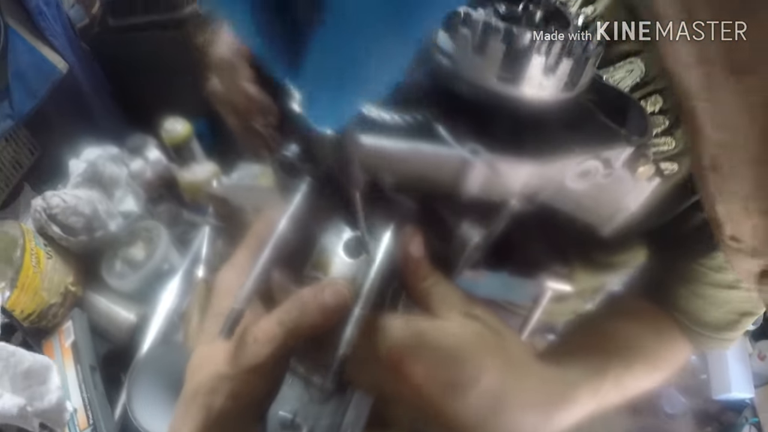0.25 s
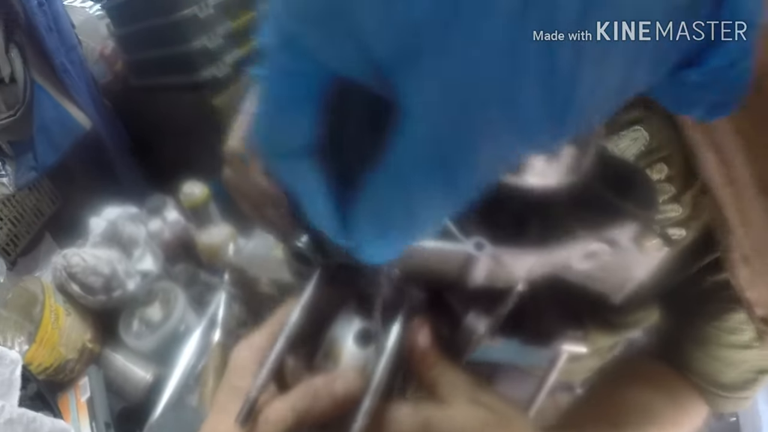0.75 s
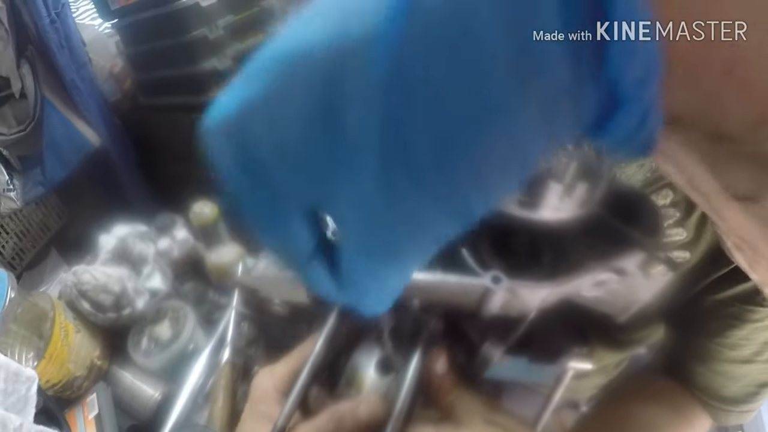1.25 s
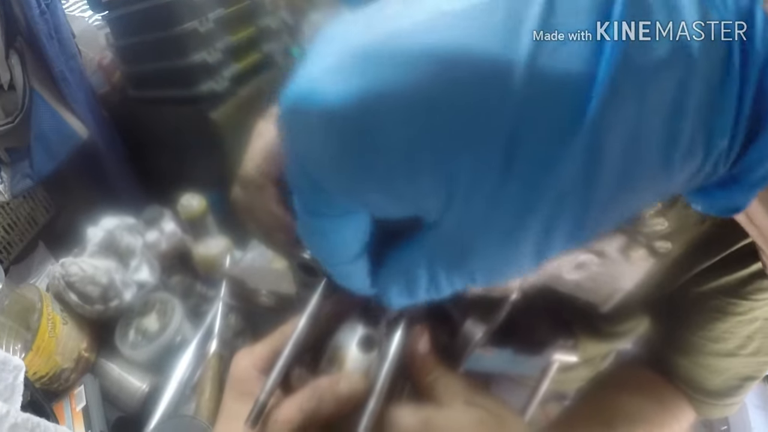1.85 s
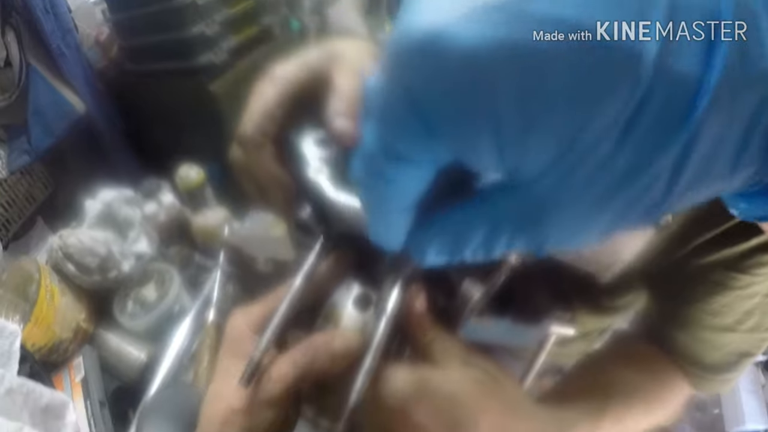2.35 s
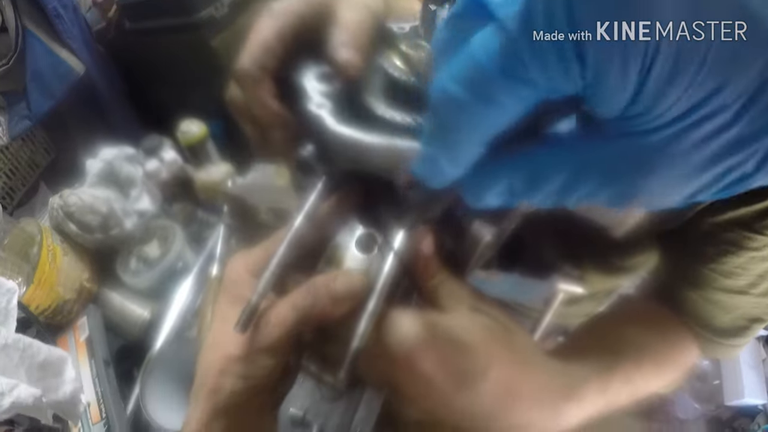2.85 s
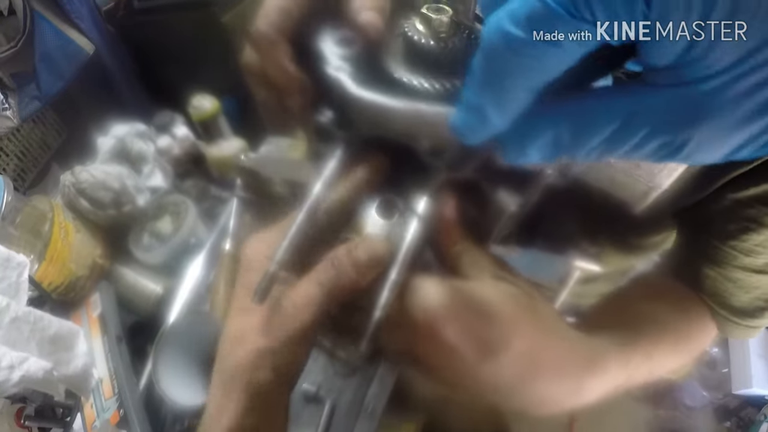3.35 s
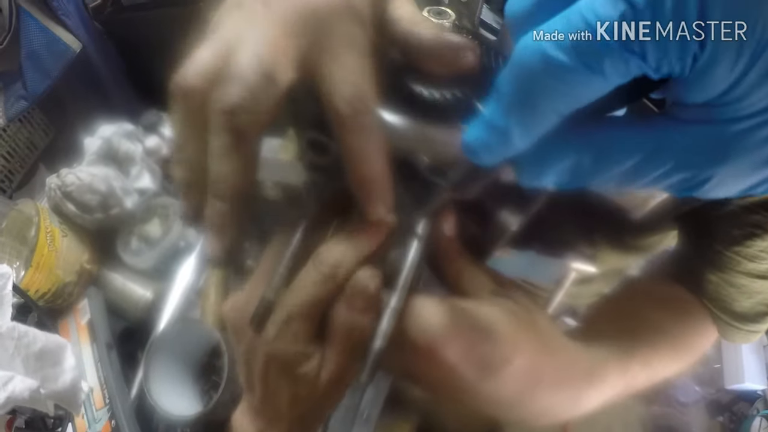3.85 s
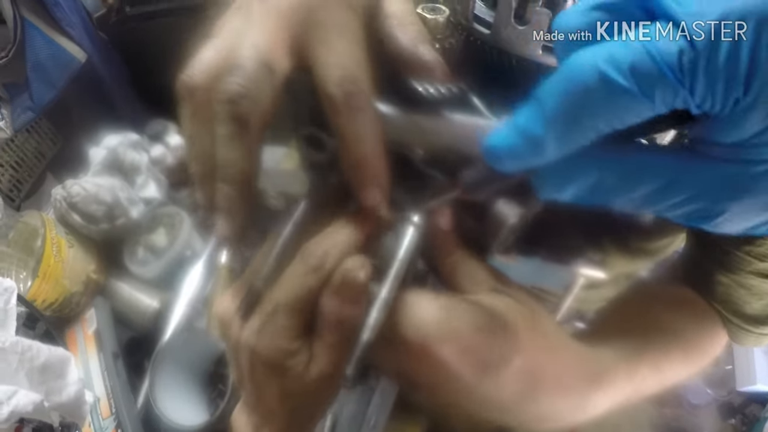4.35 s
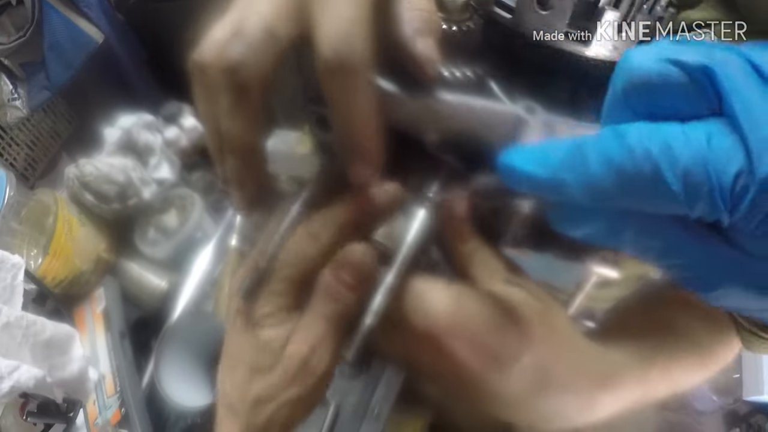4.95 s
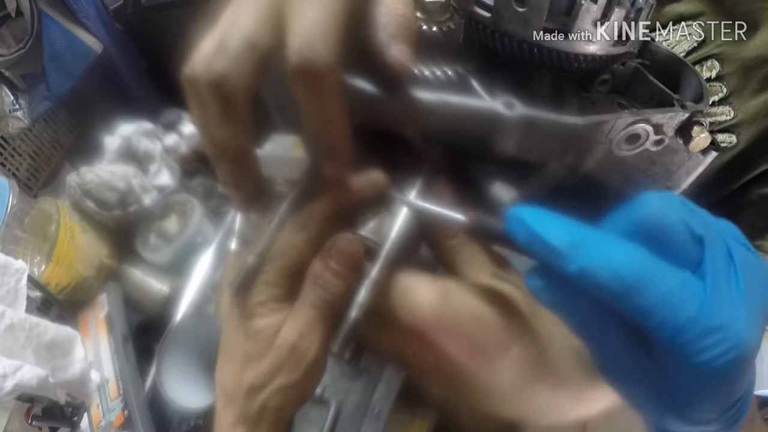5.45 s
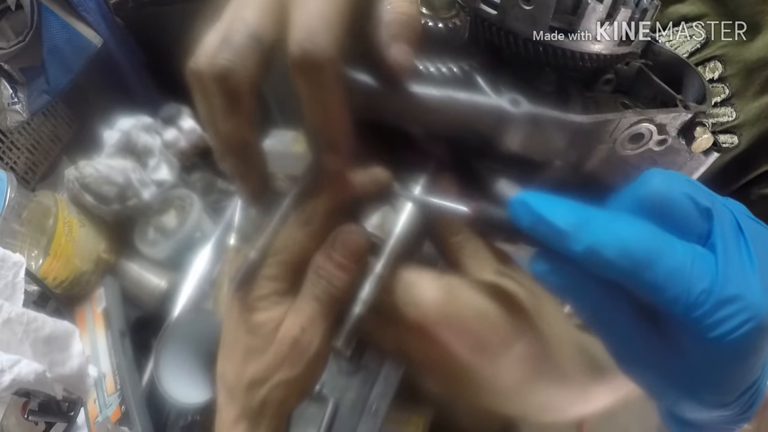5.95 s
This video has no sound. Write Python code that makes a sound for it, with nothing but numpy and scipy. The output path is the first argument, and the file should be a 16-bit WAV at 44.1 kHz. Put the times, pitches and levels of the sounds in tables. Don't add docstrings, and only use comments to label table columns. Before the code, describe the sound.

Hands work on an engine at a bench, heard close and fairly dry with a short room echo. Sparse snaps and soft rubbing come first, then a blunt tray knock and thin whistling turns while traffic swells outside. A lull with small ticks follows, then a dull nudge and the loudest hit, a hard metallic clank with settling rattle and squeaks. A sharp high clink rings briefly; only rumble, hiss and one tiny touch remain.

```python
import sys
import numpy as np
from scipy import signal
from scipy.fft import rfft, irfft, next_fast_len
from scipy.io import wavfile
from scipy.ndimage import uniform_filter1d, map_coordinates

SR = 44100
rng = np.random.default_rng(int(sys.argv[2]) if len(sys.argv) > 2 else 0)


def wav_out(sig):
    wavfile.write(sys.argv[1], SR, np.round(np.clip(np.atleast_2d(sig).T, -1, 1) * 32767).astype(np.int16))


def boost(x):
    u = np.asarray(x, float) / 20
    return 10 ** u


N = 272979
EASE_S = .007

# (frequency [Hz], width [Hz], level [dB])
CASING_PEAKS = [(973, 800, -17), (1480, 210, -7), (1860, 1200, 2), (3590, 590, 2.5), (4550, 170, -8),
                (4700, 450, 1), (6170, 390, -0.5), (7500, 280, -18.5), (9000, 1030, -22),
                (14000, 1300, -22)]
# (time [s], level [dB])
PASSING_LEVEL = [(0, -65), (.8, -59), (1.5, -57), (2, -61.5), (2.55, -60), (2.82, -67), (3.0, -69),
                 (4.4, -71.5), (5, -74), (6.19, -78)]


def unit(x):
    return x / np.sqrt(np.mean(x ** 2) + 1e-20)


def along(points, hz):
    f, v = np.transpose(points)
    return np.interp(np.log(hz + 1), np.log(f + 1), v)


def curves(rows):
    s, *cols = np.transpose(sorted(rows))
    return [np.interp(np.arange(N) / SR, s, c) for c in cols]


def strokes(tables, fade):
    gate = np.zeros(N)
    for rows in tables:
        start, end = rows[0][0] - fade, rows[-1][0] + fade
        gate[round(start * SR):round(end * SR)] = 1
    return np.abs(uniform_filter1d(gate, int(2 * fade * SR))), curves(sum(tables, []))


def held(tables, values):
    return [[(*row, *np.atleast_1d(v)) for row in rows] for rows, v in zip(tables, values)]


def wobble(rate):
    knots = rng.standard_normal(int(N * rate / SR) + 4)
    return map_coordinates(knots, [np.arange(N) * rate / SR])


def swell(s, rise, fall):
    t = np.arange(N) / SR - s
    return t / np.where(t < 0, rise, fall)


def heave(rows):
    return sum(db * np.exp(-.5 * swell(s, length, length) ** 2) for s, db, length in rows)


def filtered(x, response):
    m = next_fast_len(N + SR // 2)
    return irfft(rfft(x, m) * response(np.fft.rfftfreq(m, 1 / SR)), m)[:N]


def body(peaks):
    def response(f):
        total = 0
        for k, (centre, width, db) in enumerate(peaks):
            damping = 1j * f * width
            total = total + (-1) ** k * boost(db) * damping / (centre * centre - f * f + damping)
        return total
    return response


def rush(spectrum):
    return unit(filtered(rng.standard_normal(N), lambda hz: boost(along(spectrum, hz))))


def add(track, s, sound):
    part = track[max(round(s * SR), 0):][:len(sound)]
    part += sound[:len(part)]


def rattle_force(db, t60):
    t = np.arange(SR // 8) / SR
    return boost(db - 60 * t / max(t60, .002)) * rng.standard_normal(len(t))


def struck(contacts, part, soft_hz=np.inf):
    force = np.zeros(N)
    for s, db, t60 in contacts:
        add(force, s, rattle_force(db, t60))
    return filtered(force, lambda hz: body(part)(hz) / (1 + 1j * hz / soft_hz) ** 2)


def ringing(modes, blows, attack):
    out, t = np.zeros(N), np.arange(SR // 2) / SR
    for s, db in blows:
        ring = 0
        for hz, level, t60 in modes:
            decay = boost(level + rng.normal(0, 0.87) - 60 * t / t60)
            ring = ring + decay * np.sin(2 * np.pi * hz * t + rng.uniform(0, 2 * np.pi))
        add(out, s, boost(db) * ring * (1 - np.exp(-t / attack)))
    return out


def whistle(tables, jitter):
    gate, (hz, db) = strokes(tables, fade=0.002)
    db = db + 11 * np.exp(-((hz - 15100) / 450) ** 2)
    eased_hz = uniform_filter1d(hz, int(EASE_S * SR))
    phase = 2 * np.pi * np.cumsum(eased_hz * (1 + jitter * wobble(800))) / SR
    return gate * boost(db + 3 + 2.8 * wobble(150)) * np.sin(phase)


def casing():
    # (time [s], force [dB], contact t60 [s])
    main_blow = [
        (4.4735, -5, .01),
        (4.4755, -11, .014),
        (4.4785, -19, .012),
    ]
    # (frequency [Hz], level [dB], t60 [s])
    boss_modes = [(1950, -1, .013), (2150, -1, .013), (3420, -3, .026), (5040, -9, .014), (5850, 5, .0105),
                  (6250, 0, .007), (7400, -12, .014), (8900, -15, .01), (13900, -20, .012)]
    # (time [s], level [dB])
    boss_blows = [(4.4735, -8.5)]
    return struck(main_blow, CASING_PEAKS) + ringing(boss_modes, boss_blows, attack=0.0002)


def sliding():
    # (time [s], force [dB], contact t60 [s])
    scrapes = [(4.4495, -25, 0.035), (4.4562, -11.5, 0.022), (4.46, -6, 0.035), (4.4655, -10, 0.069),
               (4.469, -16.5, 0.056)]
    # (frequency [Hz], width [Hz], level [dB])
    slider_peaks = [(1110, 910, -7), (2440, 310, 3.5), (2540, 290, 2), (3560, 680, -5.5), (5640, 840, -1.5),
                    (5760, 1200, -4), (8400, 2400, -21), (11460, 2400, -27), (14650, 2000, -25)]
    return struck(scrapes, slider_peaks)


def bench():
    # (time [s], force [dB], contact t60 [s])
    dull_blows = [
        (4.474, -2.5, 0.024),
        (5.11, -42.5, 0.79),
        (5.144, -30.5, 0.063),
        (5.269, -37, 0.064),
        (5.325, -37, 0.022),
    ]
    # (frequency [Hz], width [Hz], level [dB])
    bench_peaks = [(178, 92, 3.5), (271, 77, 6.5), (410, 74, 4.5), (814, 310, -7), (1806, 1200, -16)]
    return struck(dull_blows, bench_peaks)


def tray():
    # (time [s], force [dB], contact t60 [s])
    landings = [
        (1.5515, -5, 0.025),
        (1.556, -10, 0.028),
        (1.572, -27, 0.03),
        (1.565, -27, 0.2),
    ]
    # (frequency [Hz], width [Hz], level [dB])
    tray_peaks = [(207, 88, 1.5), (360, 73, 0), (497, 51, -5.5), (660, 32, -12), (930, 82, -17),
                  (1260, 200, -16.5), (1810, 480, -19.5), (2270, 290, -17), (3100, 940, -20),
                  (4100, 1800, -24.5)]
    # (frequency [Hz], level [dB], t60 [s])
    floor_modes = [(234, -6, .13), (340, -8, .14), (398, -1, .085), (487, -12, .17), (650, -2, .055),
                   (1060, -12, .085)]
    # (time [s], level [dB])
    floor_blows = [(1.552, -28)]
    return struck(landings, tray_peaks, soft_hz=7040) + ringing(floor_modes, floor_blows, attack=0.0016)


def block():
    # (time [s], force [dB], contact t60 [s])
    nudges = [
        (4.2985, -10.5, 0.028),
        (4.305, -14, 0.062),
        (4.32, -29.5, 0.36),
    ]
    # (frequency [Hz], width [Hz], level [dB])
    block_peaks = [(233, 88, 4.5), (383, 175, 0), (728, 310, -12.5), (1200, 810, -20.5), (1890, 400, -20.5),
                   (3380, 340, -22), (5500, 1200, -43)]
    return struck(nudges, block_peaks)


def jaws():
    # (time [s], force [dB], contact t60 [s])
    clinks = [
        (5.3245, -7, 0.014),
        (5.329, -34.5, 0.19),
    ]
    # (frequency [Hz], width [Hz], level [dB])
    jaw_peaks = [(417, 120, -17), (804, 93, -3), (1640, 500, -11), (2470, 430, -7), (3320, 190, 4.5),
                 (5840, 970, -7), (6850, 990, -8.5), (8340, 510, -8.5), (11000, 1000, -21),
                 (13800, 1600, -19)]
    return struck(clinks, jaw_peaks)


def tip():
    # (time [s], force [dB], contact t60 [s])
    tip_contact = [(6.098, -33.5, .045)]
    # (frequency [Hz], width [Hz], level [dB])
    tip_peaks = [(1370, 190, -0.5), (2425, 650, -13), (8000, 3000, -21.5), (12950, 2700, -16)]
    return struck(tip_contact, tip_peaks)


def washer():
    # (time [s], force [dB], contact t60 [s])
    chatter = [(4.3, -37.5, 0.12), (4.328, -37.5, .1), (4.345, -39, 0.06), (4.36, -39, 0.12),
               (4.375, -40, 0.042)]
    # (frequency [Hz], width [Hz], level [dB])
    washer_peaks = [(1920, 160, 0), (3310, 100, 1.5), (5310, 1100, -14)]
    return struck(chatter, washer_peaks)


def loose_parts():
    # (time [s], force [dB], t60 [s])
    settling = [
        (4.481, -23.5, 0.36),
        (4.51, -40, 1.14),
    ]
    # (frequency [Hz], width [Hz], level [dB])
    loose_peaks = [(700, 2900, -7.5), (1900, 3800, -6.5), (5400, 2000, -12.5)]
    return struck(settling, loose_peaks)


def plate():
    # (frequency [Hz], level [dB], t60 [s])
    plate_modes = [(448, 0, .31), (459, -14, .2), (480, -5, .06), (1077, -22, .15), (1389, -26, .25),
                   (1739, -24, .16), (2207, -28, .25)]
    # (time [s], level [dB])
    plate_blows = [
        (1.565, -50),
        (4.481, -22.5),
        (5.325, -54),
    ]
    # (time [s], level change [dB], length [s])
    ring_heaves = [(4.494, -0.5, .008), (4.542, -0.5, .01), (4.585, -10, 0.0059), (4.612, 6.5, 0.0067),
                   (4.7, 8.5, 0.018)]
    return boost(heave(ring_heaves)) * ringing(plate_modes, plate_blows, attack=0.0082)


def spanner():
    # (frequency [Hz], level [dB], t60 [s])
    spanner_modes = [(2650, -9, .06), (3165, -10, .09), (3240, -9, .065), (7838, -20, .45), (7908, -24, .4),
                     (7962, -20, .5), (8048, -19, .5), (8129, -7, .1), (8350, -6, .05), (13390, -24, .13),
                     (13580, -22, .1), (13750, -22, .07), (13880, -18, .05), (14150, -12, .03)]
    # (time [s], level [dB])
    spanner_blows = [
        (5.326, -29),
        (6.102, -67),
        (6.107, -73),
    ]
    return ringing(spanner_modes, spanner_blows, attack=0.0023)


def shank_and_handle():
    # (frequency [Hz], level [dB], t60 [s])
    shank_modes = [(7838, -12, .11), (7920, -3, .11), (7962, -12, .08), (8050, 0, .11)]
    # (time [s], level [dB])
    shank_blows = [
        (5.33, -45),
        (5.346, -32),
    ]
    # (frequency [Hz], level [dB], t60 [s])
    handle_modes = [(8050, 0, .4), (7965, -10, .3)]
    # (time [s], level [dB])
    handle_blows = [(6.128, -65)]
    return ringing(shank_modes, shank_blows, attack=0.0036) + ringing(handle_modes, handle_blows, attack=.002)


def side_cover():
    # (frequency [Hz], level [dB], t60 [s])
    cover_modes = [(229, -5.5, 0.042), (311, -5.5, .12), (611, -1, 0.036), (828, -6.5, 0.035),
                   (1480, -8, 0.12)]
    # (time [s], level [dB])
    cover_blows = [(4.478, -31)]
    return ringing(cover_modes, cover_blows, attack=0.0029)


def sinking_ring():
    # (time [s], frequency [Hz], level [dB rms])
    sag = [(5.327, 14350, -50), (5.333, 14200, -50), (5.343, 13800, -49), (5.348, 13840, -56),
           (5.365, 13500, -71), (5.385, 13500, -75), (5.4, 13350, -82)]
    gate, (hz, db) = strokes([sag], fade=.001)
    phase = 2 * np.pi * np.cumsum(hz * (1 + .006 * wobble(500))) / SR
    return gate * boost(db + 3 + 4.5 * wobble(250)) * np.sin(phase)


def taps():
    # (time [s], peak [dB], contact t60 [s], edge brightness [dB])
    contacts = [(4.435, -53, 0.016, -25), (4.5025, -36, 0.02, -10), (4.5445, -49, 0.018, -17),
                (4.5753, -47, 0.016, -32), (4.846, -55.5, 0.014, -26.5), (4.979, -56, 0.018, -22),
                (5.145, -67.5, 0.023, -12), (5.183, -61, 0.016, -7.5), (5.269, -49.5, 0.015, -30.5)]
    metal = struck([(s, db + 9.5, t60) for s, db, t60, _ in contacts], CASING_PEAKS)
    edges = [(s, db + bright_db + 0.5, t60) for s, db, t60, bright_db in contacts]
    return metal + struck(edges, [(10900, 15500, 0.0038)])


def grazes():
    graze_times = [2.449, 2.449, 4.5755, 4.578, 4.601, 1.59, 1.592, .096, 5.271, 4.474, 5.325, 4.576, 1.552,
                   1.558, 4.5025, 4.4505, 5.3245, 5.3247, 4.5028, 4.46, 1.552, 4.465]
    # (force [dB], contact t60 [s], frequency [Hz], width [Hz])
    graze_sounds = [(-36, 0.0073, 4400, 640), (-49, .004, 11500, 2500), (-24, 0.023, 1490, 300),
                    (-24.5, .02, 350, 100), (-44, .01, 6000, 600), (-25, 0.016, 880, 200),
                    (-46, .01, 2300, 700), (-52, .006, 5200, 600), (-29, 0.045, 740, 170),
                    (-9, 0.02, 810, 150), (-25, 0.013, 1530, 270), (-32, .012, 4800, 600),
                    (-35, .012, 4100, 520), (-40, .02, 3300, 300), (-24, .012, 7600, 900),
                    (-33.5, .03, 2700, 600), (-26, .004, 11700, 3600), (-24, .008, 5700, 800),
                    (-27, .014, 5050, 500), (-18, .02, 5300, 700), (-32, .01, 5200, 560),
                    (-14, .03, 2550, 250)]
    out = np.zeros(N)
    for s, (db, t60, hz, width) in zip(graze_times, graze_sounds):
        peak = signal.iirpeak(hz, hz / (1.55 * width), fs=SR)
        once = signal.lfilter(*peak, rattle_force(db, t60))
        add(out, s, signal.lfilter(*peak, once))
    return out


def ticks():
    # (time [s], peak [dB], centre [Hz])
    snaps = [(0.034, -47.5, 8000), (0.0955, -48, 3090), (0.2982, -32, 3900), (0.366, -42, 2750),
             (2.1994, -56, 12500), (2.2274, -56, 12500), (2.449, -41.5, 6500), (3.1924, -56, 11000),
             (3.56, -46, 3140), (3.6494, -59, 5700)]
    out, t = np.zeros(N), np.arange(SR // 50) / SR
    for s, db, hz in snaps:
        b, a = signal.butter(1, [.7 * hz, min(1.8 * hz, 20000)], "bandpass", fs=SR)
        crackle = 0.07 * rng.standard_normal(len(t)) * boost(-60 * t / 0.012)
        snap = signal.lfilter(b, a, (t == 0) + crackle)
        add(out, s, boost(db + 2.0) * snap / np.abs(snap).max())
    return out


def squeaks():
    # (time [s], slip rate [Hz], level [dB])
    squeak_paths = [
        [(3.158, 3620, -67), (3.195, 4100, -65), (3.208, 4450, -65), (3.215, 4850, -70), (3.24, 5100, -75),
         (3.272, 5200, -73), (3.287, 4550, -66), (3.316, 3500, -69), (3.328, 3150, -79)],
        [(4.543, 3900, -62), (4.553, 5450, -61), (4.563, 5720, -58), (4.6, 5360, -61), (4.62, 5480, -66),
         (4.65, 5745, -55), (4.685, 5280, -66), (4.72, 3800, -71), (4.74, 3370, -78)],
        [(4.922, 3720, -72), (4.948, 4270, -67), (4.97, 4590, -64), (4.99, 4410, -66), (5.012, 4330, -66),
         (5.045, 3910, -66), (5.06, 4060, -78), (5.075, 3930, -78)],
    ]
    # (second [dB], third [dB])
    multiples = [(-13, -32), (-3, -15), (-5, -22)]
    # (start [s], end [s], half-way line [dB])
    alternation = [(4.578, 4.62, -71), (4.64, 4.686, -73), (4.995, 5.055, -75)]
    gate, (hz, first_db, second_db, third_db) = strokes(held(squeak_paths, multiples), fade=0.0046)
    thin_db = first_db - 14 * np.clip((hz - 4950) / 300, 0, 1)
    half_db = -100
    for start, end, db in alternation:
        half_db = half_db + (db + 100) * strokes([[(start, 0), (end, 0)]], fade=.008)[0]
    levels_db = first_db, thin_db + second_db, thin_db + third_db, half_db
    eased_hz = uniform_filter1d(hz, int(EASE_S * SR))
    phase = 2 * np.pi * np.cumsum(eased_hz * (1 + .011 * wobble(250))) / SR
    lines = 0
    for k, db in zip((1, 2, 3, 3 / 2), levels_db):
        strength = boost(db + 5 - k + (2 + k) * wobble(90))
        tremor = .75 * (k - 1) * wobble(400)
        lines = lines + strength * np.sin(k * phase + tremor) * (k * hz < SR / 2)
    return gate * lines


def loose_whistles():
    # (time [s], frequency [Hz])
    whistle_paths = [
        [(.778, 3550), (.81, 3380), (.84, 3500), (.882, 3420)],
        [(1.362, 3600), (1.4, 4130), (1.455, 4330)],
        [(1.58, 3100), (1.635, 3400), (1.655, 4050), (1.677, 4500)],
        [(1.738, 4600), (1.765, 4270), (1.79, 4000), (1.83, 4050), (1.855, 3800)],
        [(1.93, 4120), (1.97, 4500), (2.035, 4600), (2.065, 4250), (2.078, 3800), (2.093, 3750)],
        [(2.098, 3550), (2.112, 3350)],
        [(3.45, 3600), (3.47, 3200), (3.51, 3300), (3.54, 2900)],
        [(3.99, 2350), (4.015, 2600), (4.04, 2450)],
    ]
    whistle_levels = [-71, -72, -70, -72, -65, -73, -74, -78]
    # (time [s], frequency [Hz])
    overtone_paths = [
        [(1.362, 5000), (1.38, 5300)],
        [(1.383, 10300), (1.4, 12400), (1.428, 14000), (1.455, 13100)],
        [(1.495, 11500), (1.518, 10300)],
        [(1.58, 10350), (1.64, 11700), (1.662, 13400), (1.685, 14900), (1.704, 15220), (1.73, 14800),
         (1.756, 14500)],
        [(1.82, 12300), (1.835, 11800), (1.865, 9300)],
        [(2.068, 7700), (2.092, 7300)],
        [(4.546, 9500), (4.56, 11430), (4.585, 11100)],
        [(4.595, 13500), (4.62, 13300)],
        [(4.655, 5450), (4.68, 5250)],
        [(4.922, 7450), (4.936, 8050)],
        [(5.006, 15250), (5.02, 14800)],
        [(5.1, 5900), (5.125, 7000), (5.16, 8000)],
        [(5.18, 9050), (5.208, 8600)],
        [(5.222, 9500), (5.258, 10700)],
        [(5.268, 10700), (5.32, 10430)],
        [(5.4, 10800), (5.43, 10400), (5.45, 9900), (5.472, 9000)],
        [(5.48, 10700), (5.505, 10000), (5.53, 8750)],
    ]
    overtone_levels = [-74, -77, -82, -78, -84, -80, -73, -79, -67, -72, -84, -77, -72, -80, -77, -80, -82]
    fuzzy = boost(1.5) * whistle(held(whistle_paths, whistle_levels), jitter=.042)
    return fuzzy + whistle(held(overtone_paths, overtone_levels), jitter=.008)


def rasp():
    # (fastest [s], rise [s], fall [s], low rasp [dB], high rasp [dB])
    turns = [(.67, 0.037, 0.063, -71.5, -85), (.826, 0.062, 0.071, -60.5, -71.5),
             (1.05, 0.2, 0.094, -71.5, -78), (1.43, 0.09, 0.093, -69.5, -65),
             (1.725, 0.098, 0.081, -67.5, -60.5), (1.82, 0.056, .045, -67, -70),
             (2.05, 0.22, 0.047, -73.5, -71), (3.25, 0.07, 0.069, -72, -62), (3.49, 0.1, 0.13, -70, -74),
             (3.66, .02, 0.018, -69, -74), (3.74, 0.092, .1, -73, -74), (5.07, 0.034, .06, -73, -74),
             (5.12, 0.26, 0.22, -77.5, -69)]
    # (frequency [Hz], width [Hz], level [dB])
    stud_peaks = [(2170, 710, -3.5), (3500, 380, 2), (4200, 890, -1), (6060, 700, -6)]
    # (frequency [Hz], width [Hz], level [dB])
    thread_peaks = [(5000, 1250, -0.5), (6230, 830, 1), (7200, 420, 1), (8400, 1000, -2), (9960, 550, -0.5),
                    (14500, 1600, -12)]
    low, high = np.zeros(N), np.zeros(N)
    for s, rise, fall, low_db, high_db in turns:
        speed = boost(-15 * np.abs(swell(s, rise, fall)) ** 3)
        low += speed * boost(low_db)
        high += speed * boost(high_db)
    grit = rng.standard_normal((2, N)) * boost(1.7 * wobble(250))
    stud = unit(filtered(grit[0], lambda hz: body(stud_peaks)(hz) / (1 + (hz / 6000) ** 2)))
    rough = unit(filtered(grit[1], body(thread_peaks)))
    return boost(1.5) * low * stud + boost(-1.5) * high * rough


def bumps():
    # (time [s], peak [dB], frequency [Hz], length [s], direction [sign])
    swings = [(0.638, -27.5, 102, 0.0039, -1), (0.655, -30, 100.6, 0.0039, 1),
              (0.686, -26.5, 60.4, 0.0078, 1), (0.737, -33.5, 60, 0.0042, 1), (2.402, -35, 70, 0.0059, -1),
              (2.42, -30, 63.7, 0.0052, -1), (2.449, -28, 49, 0.0082, -1), (4.309, -38.5, 80, 0.0087, 1),
              (4.4804, -21, 60.7, 0.004, -1), (4.487, -24.5, 61.6, 0.01, 1)]
    out, t = np.zeros(N), np.arange(-SR // 20, SR // 20) / SR
    for s, db, hz, length, way in swings:
        envelope = np.sign(way) * boost(db) * np.exp(-.5 * (t / length) ** 2)
        add(out, s + t[0], envelope * np.cos(2 * np.pi * hz * t))
    return out


def shop(x):
    # (frequency [Hz], t60 [s])
    decay_times = [(150, 0.47), (1000, 0.22), (4000, 0.084), (12000, 0.22)]
    hz, t, z = signal.stft(rng.standard_normal(SR // 2), SR, nperseg=256)
    decay = boost(-60 * t / along(decay_times, hz)[:, None])
    tail = signal.istft(z * decay, SR, nperseg=256)[1]
    return signal.fftconvolve(np.pad(x, (200, 0)), tail / np.linalg.norm(tail))[:N]


def traffic():
    # (frequency [Hz], density [dB per Hz])
    rolling_spectrum = [(300, -31.5), (600, -3), (800, -0.5), (1150, 1), (1500, -1), (2000, -5.5),
                        (3500, -36), (6000, -39.5)]
    # (frequency [Hz], width [Hz], level [dB])
    doorway_peaks = [(768, 31, -2), (1063, 45, 1), (1195, 45, -1), (1346, 50, 0.5), (1497, 42, -0.5)]
    level_db, = curves(PASSING_LEVEL)

    def doorway(hz):
        return 1 + sum(np.abs(body([peak])(hz)) ** 2 for peak in doorway_peaks)

    return boost(level_db - 2.0 + .5 * wobble(6.2)) * unit(filtered(rush(rolling_spectrum), doorway))


def rumble():
    # (frequency [Hz], density [dB per Hz])
    rumble_spectrum = [(8.8, -27), (15, -2.5), (41, 0), (73, -7), (168, -25.5), (247, -23), (269, -35.5),
                       (400, -26), (520, -58.5), (880, -120)]
    # (time [s], level change [dB], length [s])
    heaves = [(0.241, -3.5, 0.15), (.55, 2.5, 0.37), (1.668, 5, 0.092), (2.0, -2.5, 0.1), (2.518, 5, 0.042),
              (3.1, 2.5, 0.065), (4.323, -5.5, 0.13), (4.519, 10.5, 0.095)]
    traffic_db, = curves(PASSING_LEVEL)
    level_db = -50 + 0.21 * (traffic_db + 65) + heave(heaves)
    return boost(level_db + 1.7 * wobble(6)) * rush(rumble_spectrum)


def hum():
    # (frequency [Hz], level [dB rms])
    motor_lines = [(199.2, -75.5), (247.6, -74.5), (296.1, -77.5), (344.5, -78.5), (737.5, -83.5),
                   (1190, -97), (1497, -93), (2358, -91.5), (2998, -96), (3095, -83.5)]
    t, drift, out = np.arange(N) / SR, .002 * wobble(5), 0
    for hz, db in motor_lines:
        out = out + boost(db + 3 + 2.5 * wobble(4)) * np.sin(2 * np.pi * hz * t + hz * drift)
    return out


def hiss():
    # (frequency [Hz], density [dB per Hz])
    hiss_spectrum = [(88, -39), (150, -4), (249, -11), (269, -7.5), (291, -12), (421, -7), (755, -15.5),
                     (800, -13.5), (1330, -18.5), (2120, -17), (15700, -32)]
    return boost(-64) * rush(hiss_spectrum)


def scene():
    steel = plate() + spanner()
    hits = casing() + sliding() + bench() + tray() + block() + jaws() + tip() + washer() + loose_parts()
    hits = hits + shank_and_handle() + side_cover() + sinking_ring() + taps() + grazes() + ticks()
    thread = squeaks() + loose_whistles() + rasp()
    workshop = traffic() + rumble() + hum() + hiss()
    air = filtered(thread + workshop, lambda hz: hz < 15350)
    echo = boost(-24.0) * shop(hits + 0.46 * steel)
    return (hits + steel + echo + bumps() + air)[None]


def roll_off(x):
    return signal.sosfilt(signal.butter(12, 15870, fs=SR, output="sos"), x)


def record(dry):
    # (start [s], end [s])
    thinned = [(1.549, 1.568), (2.382, 2.422), (4.28, 4.292), (4.303, 4.32), (4.431, 4.445), (5.261, 5.318)]
    soft = dry[0] / (1 + np.abs(dry[0] / 1.1) ** 4) ** (1 / 4)
    gate = strokes([[(start, 0), (end, 0)] for start, end in thinned], fade=.002)[0]
    soft = soft - .9 * gate * filtered(soft, lambda hz: hz > 13000)
    mix = filtered(soft, lambda hz: np.clip((15780 - hz) / 500, 0, 1))[None]
    return roll_off(mix)


dry = scene()
out = record(dry)
wav_out(out)
```